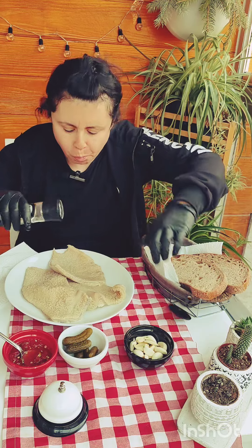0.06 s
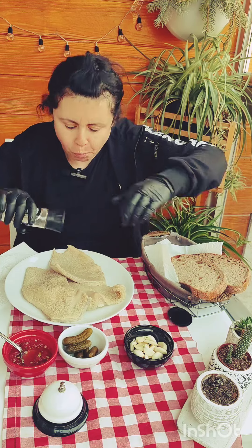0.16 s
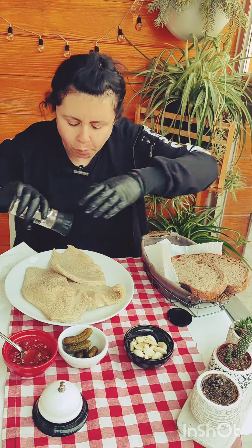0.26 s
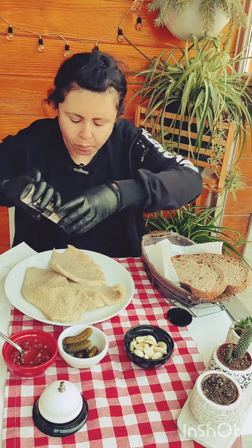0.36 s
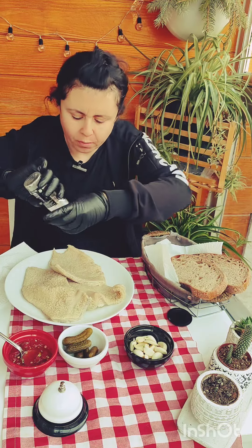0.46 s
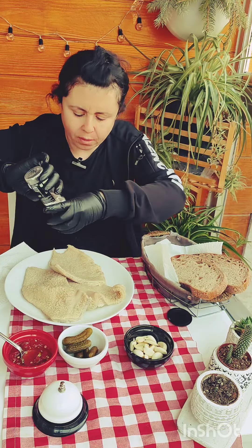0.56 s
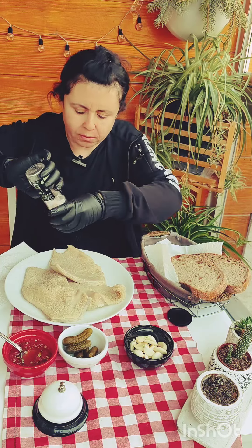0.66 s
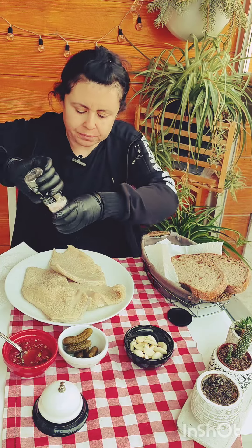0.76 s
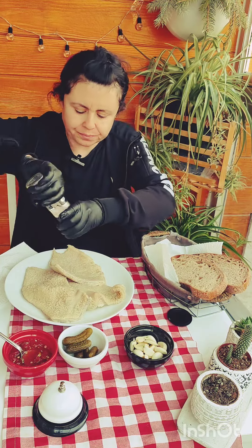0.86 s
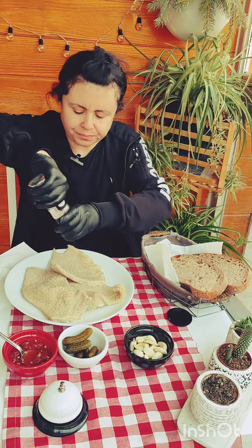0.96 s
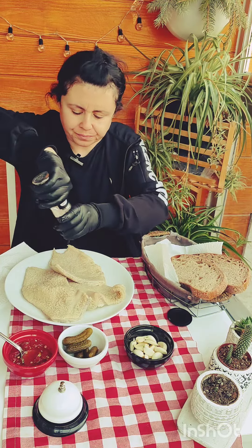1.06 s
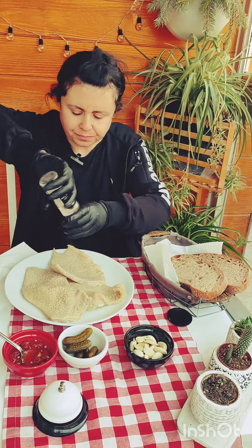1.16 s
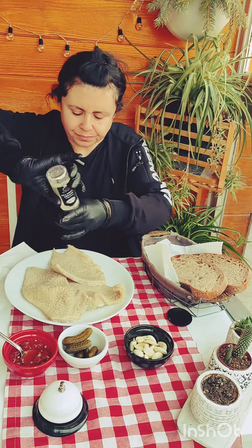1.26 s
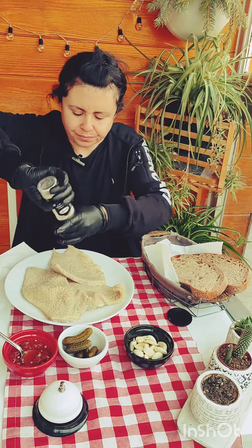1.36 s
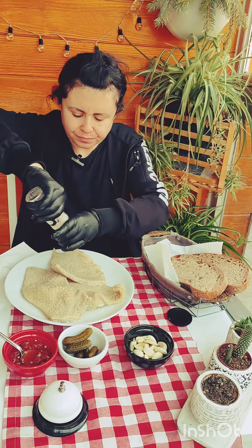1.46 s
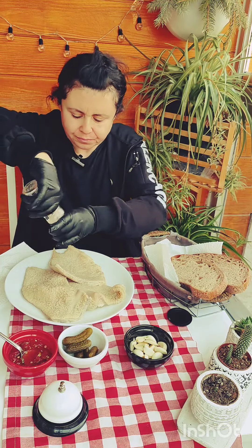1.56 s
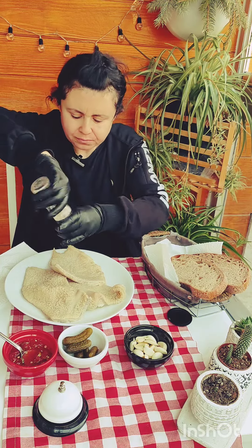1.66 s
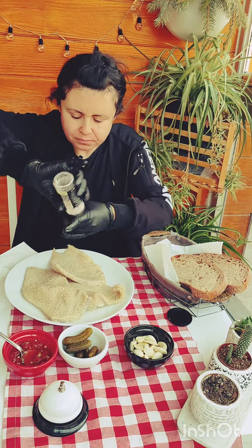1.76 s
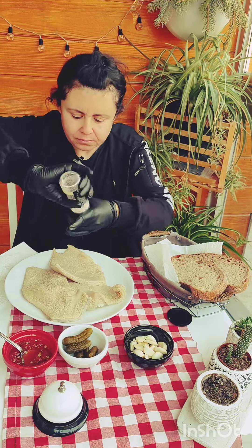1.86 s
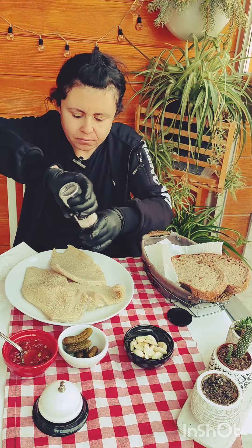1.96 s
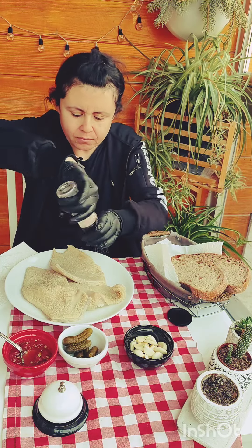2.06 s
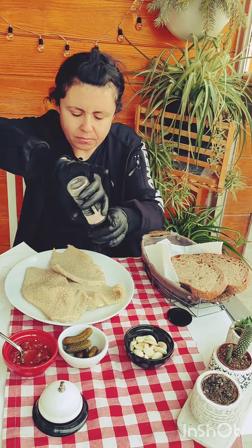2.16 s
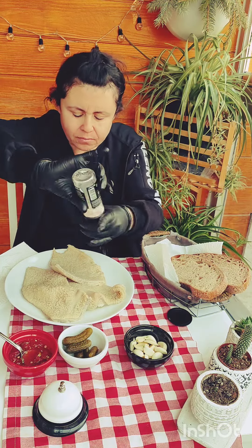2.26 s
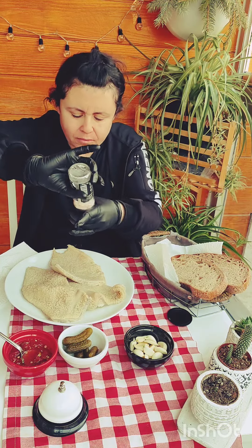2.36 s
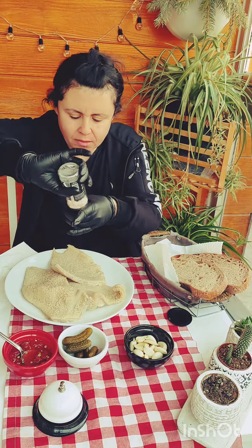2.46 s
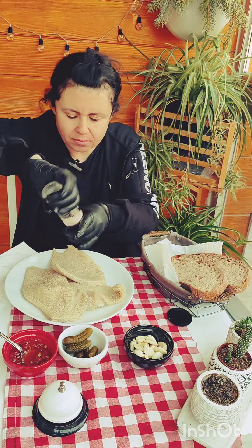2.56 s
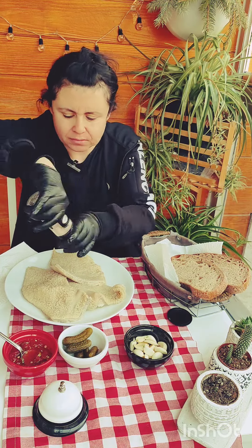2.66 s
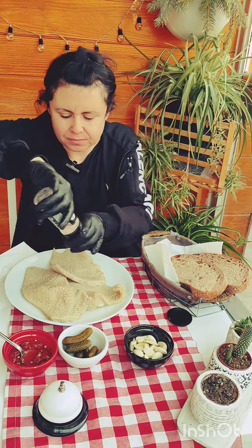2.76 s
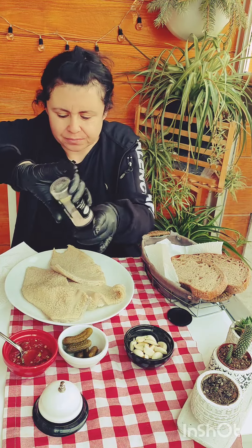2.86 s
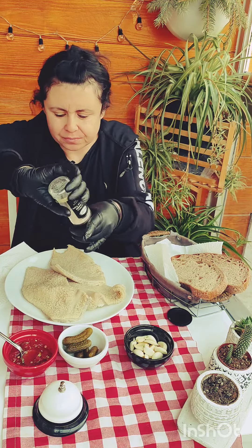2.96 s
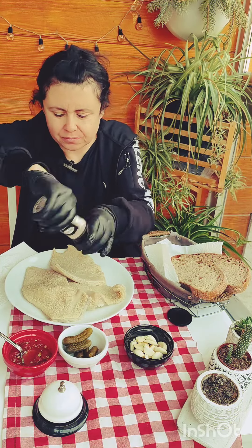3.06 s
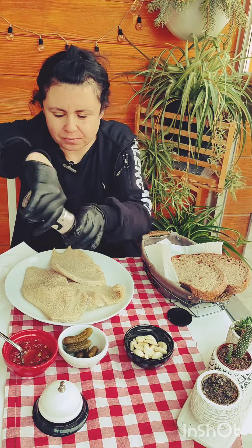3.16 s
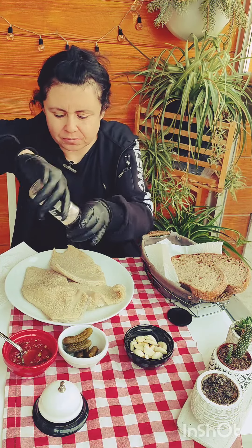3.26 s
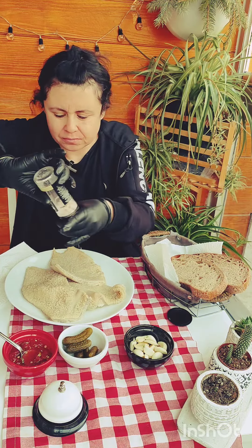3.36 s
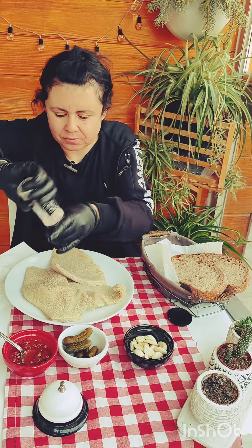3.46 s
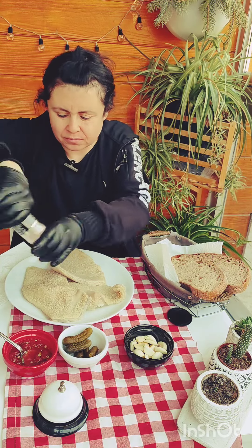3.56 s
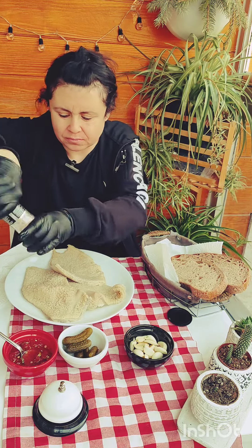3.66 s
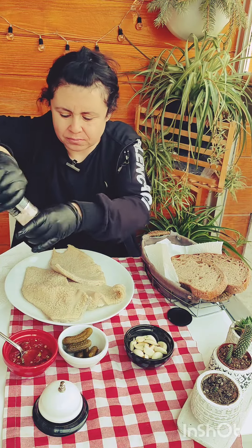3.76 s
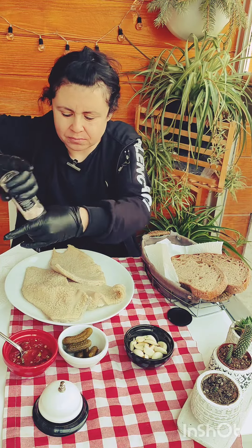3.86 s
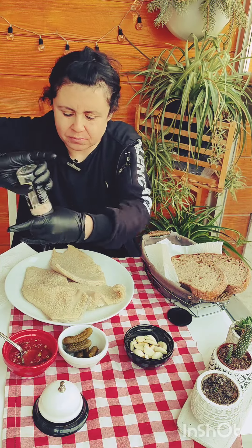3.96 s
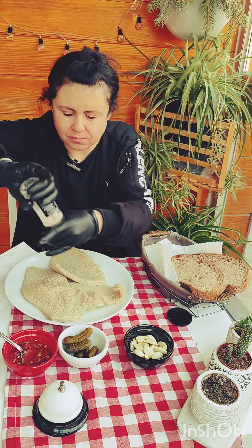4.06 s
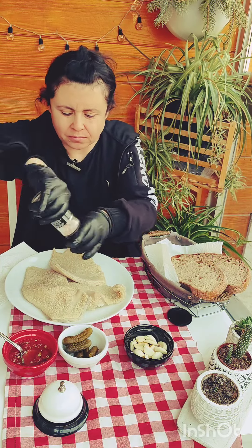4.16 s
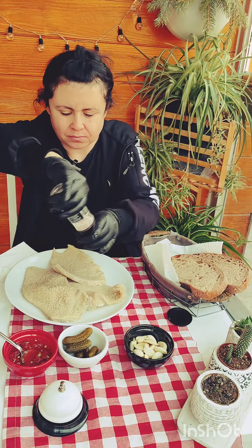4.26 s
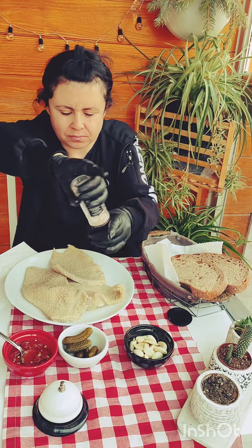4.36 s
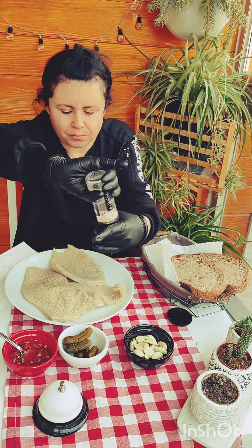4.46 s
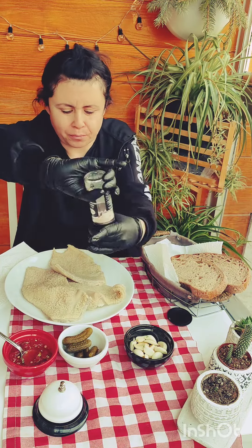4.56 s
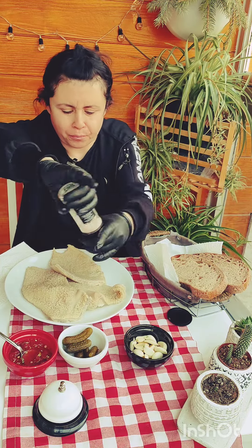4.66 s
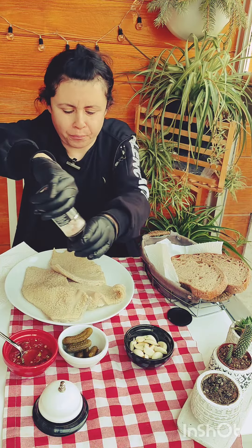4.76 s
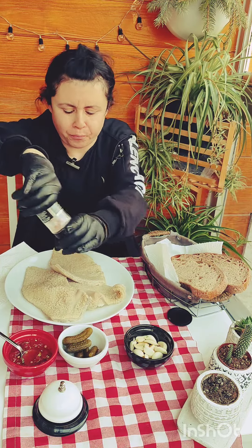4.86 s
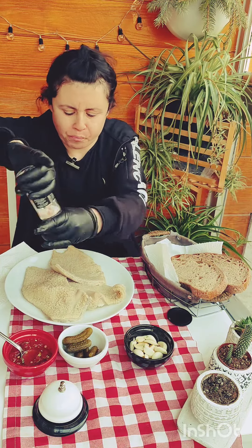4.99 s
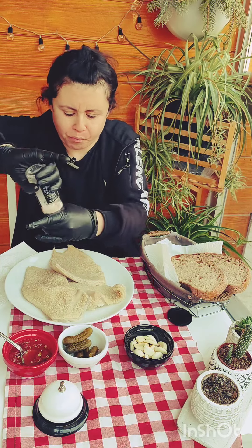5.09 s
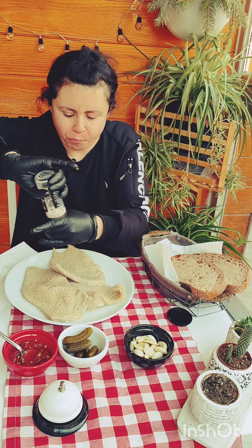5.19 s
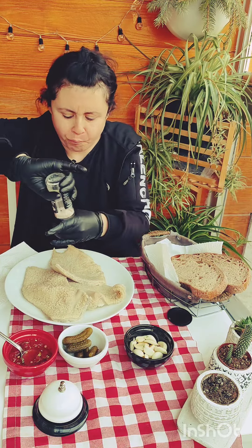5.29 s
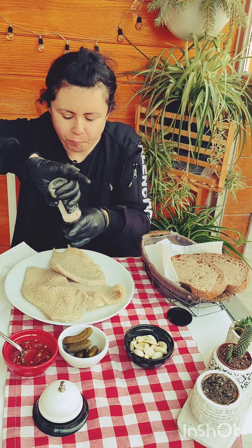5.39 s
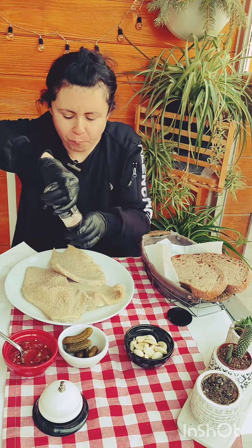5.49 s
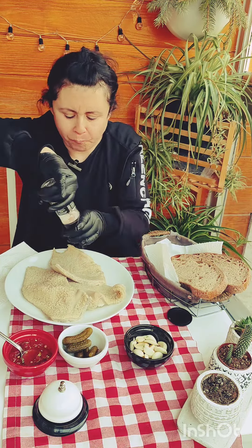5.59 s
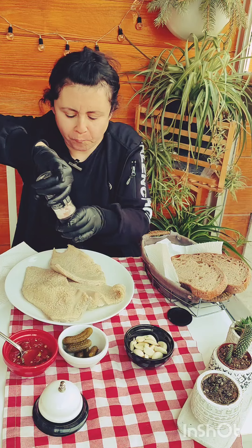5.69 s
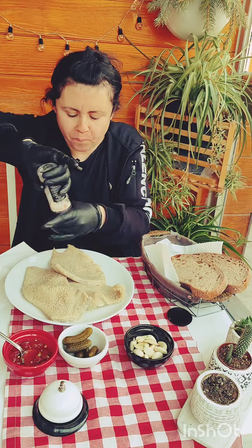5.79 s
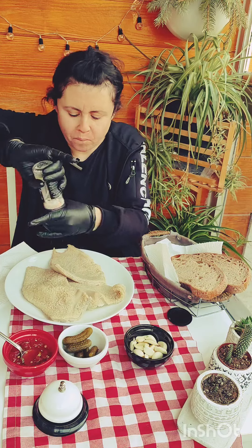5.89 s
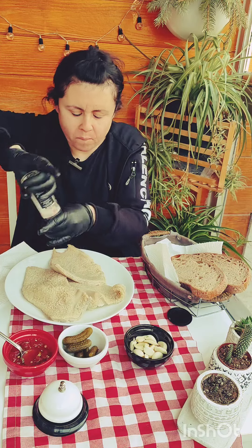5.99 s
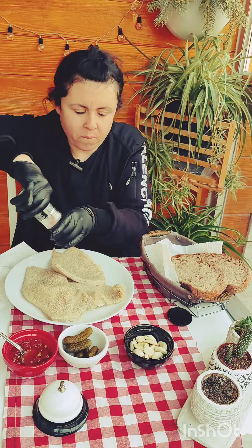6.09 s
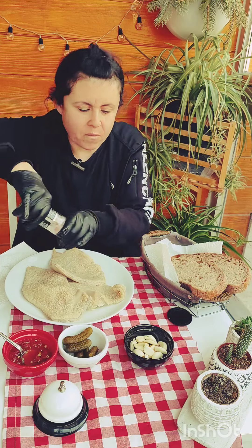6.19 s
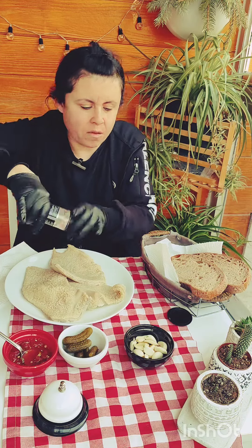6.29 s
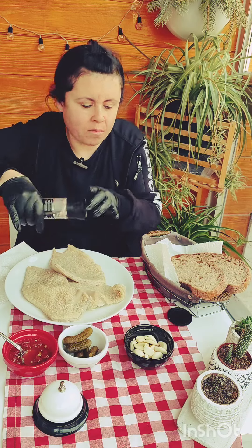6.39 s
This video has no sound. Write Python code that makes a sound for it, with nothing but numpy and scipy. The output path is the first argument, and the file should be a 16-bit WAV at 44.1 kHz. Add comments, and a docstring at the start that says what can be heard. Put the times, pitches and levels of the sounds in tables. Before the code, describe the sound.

Close, slightly thin pickup in a small, live wooden room with quiet hiss, a very faint steady whine and slow, barely noticeable swells of broad noise. At 0.03 s a plastic cap lands on a cloth-covered table, hollow thuds rocking quickly to rest by 0.25. From 0.2 to 0.6 salt slides and ticks brightly in the jar; rubber gloves brush and squeak near 0.55. Then a hand mill bites in short gritty crunches, big crystals snapping in rapid clusters: about 0.95, 1.5, 2.0, 2.6, 3.15, 3.6, a heavier, lower one at 4.2, then 4.7, 5.5 and 6.15. Each lasts only one or two tenths of a second, with a short room tail. Between them come soft burr scrapes, clearest around 4.0 and 4.5, small salt shifts, a glove rub at 3.45 and a faint squeak near 5.1. Tiny grain ticks and a light glove brush close at 6.4.

```python
"""A mill's plastic cap lands and rocks on a cloth-covered table in a small, live room: noise thuds over ringing modes.
Salt slides down the jar as filtered grains and ticks it with short pings; gloves brush and squeak as rough tones.
Then come the hand salt mill's forward turns: bites of crumbling noise, and big crystals snapping as pitched bursts.
Around them, unloaded burrs scrape as bumpy noise, and more salt and glove sounds return.
Behind it all, faint broad noise slowly rises and falls over steady room noise and a thin electrical whine."""
import sys
import numpy as np
from scipy import signal
from scipy.fft import rfft, irfft
from scipy.io import wavfile
from scipy.ndimage import uniform_filter1d, minimum_filter1d

SR = 44100
rng = np.random.default_rng(int(sys.argv[2]) if len(sys.argv) > 2 else 0)


def master_out(mix):
    """Clip the mix to full scale and print it as 16-bit PCM to the path in sys.argv[1]."""
    frames = np.transpose(np.atleast_2d(mix))
    ceiling = np.clip(frames, -1, 1)
    pcm = np.round(ceiling * 32767).astype(np.int16)
    wavfile.write(sys.argv[1], SR, pcm)


N = 283563  # length in samples

# Event levels are relative: each source adds its own trim, then the room and microphone act on the mix.
# big crystals snapping: start_s [s], knock_db [dB], pitch_hz [Hz], splinter_db [dB]
CRYSTAL_CRACKS = [(.728, -50, 1596, -55), (0.953, -13, 1690, -18), (0.977, -19.5, 1640, -27),
                  (1.025, -39.5, 2010, -26.5), (1.08, -15.5, 1950, -16), (1.089, -13.5, 1350, -24.5),
                  (1.098, -20, 1500, -28), (1.471, -47, 1500, -56), (1.512, -23.5, 3200, -17),
                  (1.521, -20, 2100, -17.5), (1.528, -9.5, 1750, -20.5), (1.539, -11.5, 1965, -18.5),
                  (1.546, -13, 1565, -22.5), (1.658, -25, 1850, -28.5), (2.02, -29.5, 2180, -25),
                  (2.042, -20, 1900, -18.5), (2.061, -12.5, 1976, -22.5), (2.09, -10, 1940, -20.5),
                  (2.136, -12.5, 1300, -28.5), (2.143, -19.5, 2380, -34.5), (2.634, -17.5, 1954, -20),
                  (2.646, -9.5, 1680, -22.5), (2.657, -13, 1806, -28), (2.667, -11, 1880, -21.5),
                  (2.678, -15.5, 1210, -22.5), (2.688, -10.5, 1870, -23), (3.154, -16.5, 2200, -24),
                  (3.166, -12, 1840, -23.5), (3.178, -10, 1196, -27), (3.192, -17, 1880, -21.5),
                  (3.575, -9.5, 4310, -25.5), (3.605, -14.5, 2100, -26), (3.623, -14, 1490, -28.5),
                  (3.638, -13, 2000, -17), (3.655, -8.5, 1820, -20.5), (3.671, -13.5, 1280, -23),
                  (3.691, -14.5, 2264, -26.5), (3.932, -25, 1190, -33), (3.972, -35, 1210, -37),
                  (3.995, -33.5, 1390, -25.5), (4.192, -10, 1740, -15), (4.206, -11.5, 1600, -19.5),
                  (4.226, -11, 1360, -21), (4.244, -3.5, 950, -26.5), (4.269, -12.5, 985, -23.5),
                  (4.323, -33.5, 1390, -33.5), (4.537, -23, 1090, -36), (4.725, -22, 1300, -30),
                  (4.738, -28.5, 2480, -16), (4.746, -9, 950, -17.5), (4.774, -11, 1760, -18.5),
                  (4.808, -14, 1210, -23), (4.815, -10.5, 1880, -22), (4.883, -18, 970, -24.5),
                  (5.561, -9, 1360, -20.5), (5.577, -9, 1670, -21.5), (5.613, -15.5, 1300, -29),
                  (6.159, -18.5, 3780, -18), (6.169, -18, 2027, -25), (6.195, -18.5, 2350, -29.5)]
# the burrs biting into salt: start_s [s], length_s [s], crumble_db [dB], powder_db [dB]
BURR_BITES = [(0.958, 0.026, -13.5, -24.5), (1.086, .035, -19.5, -27.5), (1.517, 0.05, -12, -20),
              (1.63, .026, -22.5, -31.5), (2.033, .036, -12, -20.5), (2.11, 0.023, -18.5, -30.5),
              (2.63, 0.046, -13.5, -22), (2.7, 0.087, -23.5, -34), (3.129, 0.026, -28.5, -28),
              (3.146, .036, -10.5, -21), (3.195, 0.076, -26.5, -37.5), (3.565, .03, -23, -23),
              (3.596, .068, -11, -20.5), (3.673, .045, -16.5, -33), (4.199, .055, -24, -25.5),
              (4.727, 0.029, -13, -18.5), (4.796, 0.065, -18, -26.5), (4.875, 0.03, -16.5, -42),
              (5.498, 0.021, -21.5, -28), (5.566, 0.042, -22, -27.5), (6.108, .03, -30.5, -32.5),
              (6.162, 0.037, -14.5, -27), (6.222, .072, -23.5, -38.5)]
# scrapes on the way back or just before the burrs catch:
# peak_s [s], rise_s [s], fall_s [s], scrape_db [dB], powder_db [dB]
BURR_SCRAPES = [(1.315, 0.047, 0.054, -71, -40.5), (1.5, 0.074, .02, -59.5, -60),
                (1.83, 0.071, .2, -62.5, -47), (3.9, 0.029, 0.091, -41, -36),
                (3.981, 0.077, 0.071, -19.5, -31.5), (4.182, 0.02, .015, -36.5, -34),
                (4.492, 0.021, 0.12, -34.5, -35.5), (4.577, 0.05, 0.039, -26, -29),
                (5.061, 0.058, 0.076, -54, -52.5), (5.169, 0.087, 0.039, -34, -33.5),
                (5.26, 0.032, 0.033, -55.5, -49.5), (5.497, 0.034, .02, -45, -49.5),
                (5.935, .09, 0.038, -42, -47), (6.105, 0.02, .02, -43, -48.5)]
# forward turns, whose grip opens or muffles the mill's hollow: start_s [s], thrum_db [dB], belly_db [dB]
MILL_TURNS = [(.95, 10, 3), (1.511, 3.5, -7), (2.02, -0.5, -2.5), (2.631, -1, 6), (3.131, 8, 0.5),
              (3.57, -1.5, -2.5), (4.18, 0.5, 1.5), (4.719, 6, 6.5), (5.499, -0.5, 3.5), (6.121, -1, 1.5)]
# salt sliding as the jar tilts: peak_s [s], rise_s [s], fall_s [s], level_db [dB]
SALT_SLIDES = [(.228, .045, .07, -28), (.31, .09, .25, -42), (.45, .15, .2, -44.5),
               (.525, 0.033, 0.067, -25.5), (.578, .08, 0.047, -24), (.73, 0.056, .04, -54),
               (1.38, 0.072, 0.063, -44), (2.29, 0.14, 0.11, -54), (2.39, 0.11, 0.069, -56.5),
               (3.12, 0.033, 0.035, -45), (3.365, 0.033, .11, -45.5), (3.79, 0.081, 0.13, -40),
               (4.178, 0.047, .02, -32.5), (5.49, 0.033, 0.027, -51.5)]
# loose grains hitting the jar: start_s [s], level_db [dB], pitch_hz [Hz]
GRAIN_TICKS = [(0.226, -25.5, 6970), (0.278, -32.5, 6320), (0.37, -35.5, 5900), (0.456, -35, 6090),
               (0.497, -33.5, 6410), (0.521, -22.5, 8440), (0.578, -27, 6920), (1.367, -35.5, 6910),
               (1.378, -31.5, 6610), (2.008, -33.5, 6960), (2.951, -47.5, 13700), (3.131, -27, 8770),
               (4.18, -27, 7250), (4.948, -38, 7540), (5.165, -25, 7810), (6.126, -25, 6810),
               (6.389, -34, 6770), (6.404, -34, 5650)]
# gloves brushing the mill: peak_s [s], rise_s [s], fall_s [s], level_db [dB]
GLOVE_RUBS = [(0.528, 0.019, 0.04, -34.5), (0.575, 0.066, 0.06, -28), (3.436, 0.012, 0.051, -29.5),
              (3.468, 0.031, 0.065, -27.5), (6.4, 0.017, 0.2, -39)]
# gloves slipping on the mill: start_s [s], length_s [s], level_db [dB], pitch_hz [Hz], width_hz [Hz]
GLOVE_SQUEAKS = [(0.523, 0.04, -27, 1906, 135), (0.546, 0.052, -34.5, 1895, 202),
                 (0.548, 0.057, -36.5, 3345, 690), (1.638, 0.029, -36.5, 1571, 200),
                 (3.041, 0.027, -57, 582, 162), (3.432, 0.029, -36, 4500, 656),
                 (3.452, 0.075, -33, 4028, 446), (4.995, 0.077, -52.5, 3880, 90),
                 (5.032, 0.066, -49, 1116, 69), (5.043, 0.099, -53.5, 2976, 140),
                 (5.129, 0.071, -38, 1230, 111.3), (5.875, 0.032, -54.5, 636, 133),
                 (6.4, 0.017, -45, 3240, 500)]
# the cap landing and rocking on the cloth: start_s [s], level_db [dB]
CAP_HITS = [(.034, -15), (0.041, -11), (.053, -16), (0.061, -9), (.081, -28), (0.094, -21.5),
            (0.121, -23.5), (0.154, -22.5), (0.189, -34.5), (0.217, -30.5), (0.236, -36.5)]
# slow rises and falls of faint background noise: peak_s [s], rise_s [s], fall_s [s], level_db [dB]
BACKGROUND_SWELLS = [(.65, .8, 0.27, -60), (1.3, 0.98, .7, -63.5), (2.3, .6, 0.2, -64), (3.4, 1, 1, -64.5),
                     (4.4, 1, .8, -62), (5.25, 1, 0.33, -58), (5.8, .3, 0.25, -64.5), (6.42, 0.26, .5, -59)]

# Spectra give the shape only; colour() sets their energy.
# salt breaking up: freq_hz [Hz], level_db [dB]
CRUMBLE_SPECTRUM = [(40, -43.5), (150, -36.5), (280, -11.5), (450, -12), (700, -3), (1100, 4.5),
                    (1800, 0.5), (2600, -1.5), (3400, 1.5), (3900, -4.5), (4400, -3), (5400, -14.5),
                    (8000, -23.5), (16000, -51.5)]
# bright splinters of a crystal: freq_hz [Hz], level_db [dB]
SPLINTER_SPECTRUM = [(2000, -25), (4300, -5.5), (5400, -13.5), (7200, 2), (8100, -7), (9200, -5),
                     (10300, -17), (12700, -24.5), (16000, -30.5)]
# fine salt powder: freq_hz [Hz], level_db [dB]
POWDER_SPECTRUM = [(2000, -34), (5400, -17.5), (6500, -7.5), (7200, -0.5), (8100, -10.5), (9200, -6),
                   (10300, -16), (11300, -11.5), (12700, -20.5), (14000, -20), (16000, -24.5)]
# burrs scraping unloaded: freq_hz [Hz], level_db [dB]
SCRAPE_SPECTRUM = [(59, -93.5), (100, -28.5), (202, -22), (269, -7.5), (370, -11.5), (676, -6), (1030, 3),
                   (1510, -2.5), (1910, -2.5), (2080, -10), (2720, -3.5), (3930, -14), (5500, -21.5),
                   (7150, -39), (12100, -120)]
# salt against the jar wall: freq_hz [Hz], level_db [dB]
JAR_SPECTRUM = [(2000, -35), (5300, -24), (5800, -12), (6150, 1), (6700, -3), (7300, -5), (8000, -10),
                (8900, -7), (10200, -20), (12800, -21), (14100, -8), (15000, -16), (16000, -28)]
# rubber glove on the mill: freq_hz [Hz], level_db [dB]
GLOVE_SPECTRUM = [(500, -46.5), (2200, -34), (3200, -5.5), (4200, -0.5), (5200, -3), (7000, -2),
                  (10000, -7.5), (15000, -20.5)]
# thud of the cap: freq_hz [Hz], level_db [dB]
CAP_SPECTRUM = [(50, -54), (160, -33), (330, -0.5), (600, 5.5), (1100, 2), (1700, -8), (2200, -16.5),
                (3000, -25.5), (4500, -33), (5500, -61.5), (12000, -72.5)]
# broad background noise that rises and falls: freq_hz [Hz], level_db [dB]
BACKGROUND_SPECTRUM = [(60, -12.5), (300, -2), (550, -3), (900, -4), (2000, -9.5), (4500, -3.5),
                       (6000, -16.5), (15000, -20)]
# quiet room noise: freq_hz [Hz], level_db [dB]
FLOOR_SPECTRUM = [(18, -62.5), (30, -23), (394, 0.5), (740, -14), (801, -1.5), (866, -11), (1630, -6.5),
                  (5310, -24.5), (6900, -11.5), (14000, -23), (16000, -35)]

# ringing of the plastic cap: freq_hz [Hz], level_db [dB], t60_s [s]
CAP_RINGING = [(345.4, -1, 0.43), (574, -3, 0.18), (700, 1, 0.083), (807, 3, 0.15), (1036, 4, .16),
               (1100, 6, 0.1), (1207, 0, 0.2), (1434, 1, 0.25)]
# steady resonances of the room: freq_hz [Hz], level_db [dB], t60_s [s]
ROOM_RINGING = [(275, 3, .36), (346, 3, .25), (548, 5, .2), (865, -4, .24), (1272, -3, .28),
                (1523, -1, .26), (1830, -2, .25), (2004, 2, .2), (3425, -3, .2), (4232, 0, .25)]
# decay of the room's echoes: freq_hz [Hz], t60_s [s]
ROOM_DECAY = [(200, 0.57), (550, 0.24), (1400, 0.23), (3700, 0.27), (7000, .19), (9700, 0.21), (12000, 0.1),
              (15000, 0.27)]
# electrical whine: freq_hz [Hz], peak_db [dB, peak amplitude]
WHINE_PARTIALS = [(800, -68), (1600, -72), (2400, -77), (3200, -76), (4000, -77), (4800, -83), (5600, -85),
                  (6400, -85)]

BITE_ATTACK_S, BITE_SAG_DB_PER_S, BITE_RELEASE_DB_PER_S = 0.0078, 30, 597
SWELL_DB = 20  # climb over a swell's rise, and drop over its fall
TOP_HZ = 15700  # band limit of the microphone


def amp(db):
    """Decibels to gain."""
    return 10 ** (np.asarray(db) / 20)


def unit(x):
    """Scale to rms 1."""
    return x / np.sqrt(np.mean(x ** 2) + 1e-20)


def along(points, hz):
    """Read (Hz, value) points on a log frequency axis."""
    point_hz, values = np.transpose(points)
    return np.interp(np.log(hz + 1), np.log(point_hz), values)


def add(track, s, sound):
    """Mix a sound into the track at time s, in seconds."""
    part = track[max(round(s * SR), 0):][:len(sound)]
    part += sound[:len(part)]


def colour(x, spectrum, size=2048):
    """Pass x through a causal, minimum-phase body of unit energy with this spectrum."""
    level_db = along(spectrum, np.fft.rfftfreq(size, 1 / SR))
    cepstrum = irfft(np.log(amp(level_db)))
    # folding the cepstrum puts the body's energy as early as possible
    cepstrum[1:size // 2] *= 2
    cepstrum[size // 2 + 1:] = 0
    body = irfft(np.exp(rfft(cepstrum)))
    return signal.fftconvolve(x, body / np.linalg.norm(body))[:len(x)]


def grains(rate, spread_db, hiss, smear_s=0.00047):
    """Uneven tiny impacts (rate per second), each a brief rasp, over a hiss of smaller ones; rms 1."""
    hits = rng.random(N) < rate / SR
    sizes = amp(spread_db * np.clip(rng.standard_normal(N), -2, 2)) * hits
    power = signal.lfilter([1], [1, -np.exp(-1 / (smear_s * SR))], sizes ** 2)
    envelope = np.sqrt(power / power.mean() + hiss ** 2)
    return unit(envelope * rng.standard_normal(N))


def ring(modes, t):
    """Sum decaying modes with random phases."""
    total = 0
    for hz, db, t60_s in modes:
        total = total + amp(db - 60 * t / t60_s) * np.sin(2 * np.pi * (hz * t + rng.random()))
    return total


def blow(x, size=176):
    """Scale a short hit by the level of its attack, the first 4 ms unless given in samples."""
    return x / (x[:size].std() + 1e-12)


def swell(peak_s, rise_s, fall_s):
    """Gain of one swell: it climbs SWELL_DB to its peak over the rise and keeps sinking at the fall's rate."""
    t = np.arange(N) / SR - peak_s
    return amp(-SWELL_DB * np.maximum(-t / rise_s, t / fall_s))


def swells(rows):
    """Summed gain of several swells, each with its own level."""
    return sum(amp(db) * swell(peak_s, rise_s, fall_s) for peak_s, rise_s, fall_s, db in rows)


def crystal_cracks(knock_t60_s=0.007, splinter_t60_s=0.02, rise_s=0.00048, kick_gain=1.204,
                   knock_db=0, splinter_db=-1):
    """A crystal bursts: a spray of splinters, and a kick that rings the hand-damped mill for a few cycles."""
    out, t = np.zeros(N), np.arange(SR // 30) / SR
    onset = 1 - np.exp(-(t / rise_s) ** 2)
    knock_fade = onset * amp(-60 * t / knock_t60_s)
    splinter_fade = onset * amp(-60 * t / splinter_t60_s)
    for s, db, hz, fine_db in CRYSTAL_CRACKS:
        burst = blow(colour(rng.standard_normal(len(t)) * knock_fade, CRUMBLE_SPECTRUM))
        # the gradient thins the bass: a small body radiates little of it
        kick = blow(np.gradient(onset * ring([(hz, 0, knock_t60_s)], t)))
        splinters = blow(colour(rng.standard_normal(len(t)) * splinter_fade, SPLINTER_SPECTRUM))
        knock = blow(burst + kick_gain * kick)
        add(out, s, amp(db + knock_db) * knock + amp(fine_db + splinter_db) * splinters)
    return out


def bite(start_s, length_s):
    """Gain of one bite: the burrs catch quickly, the load sags as the salt gives way, then lets go."""
    t = np.maximum(np.arange(N) / SR - start_s, 0)
    past_end = np.maximum(t - length_s, 0)
    return np.minimum(t / BITE_ATTACK_S, 1) * amp(-BITE_SAG_DB_PER_S * t - BITE_RELEASE_DB_PER_S * past_end)


def grinding(crumble_db=-6, powder_db=-6):
    """Small fragments crumble between the burrs; each break also sheds powder."""
    breaks = grains(rate=580, spread_db=5, hiss=.35)
    dust = unit(breaks + 1.2 * grains(rate=3600, spread_db=22.5, hiss=0.56))
    coarse_gain, fine_gain = np.zeros(N), np.zeros(N)
    for s, length_s, db, fine_db in BURR_BITES:
        gain = bite(s, length_s)
        coarse_gain += amp(db) * gain
        fine_gain += amp(fine_db) * gain
    crumbling = colour(breaks * coarse_gain, CRUMBLE_SPECTRUM) * amp(crumble_db)
    powder = colour(dust * fine_gain, POWDER_SPECTRUM) * amp(powder_db)
    return crumbling + powder


def burr_scrapes(scrape_db=-3, powder_db=-3):
    """Unloaded, the burrs only scrape over the powder."""
    bumps = grains(rate=400, spread_db=6.5, hiss=1.0)
    coarse_gain, fine_gain = np.zeros(N), np.zeros(N)
    for peak_s, rise_s, fall_s, db, fine_db in BURR_SCRAPES:
        gain = swell(peak_s, rise_s, fall_s)
        coarse_gain += amp(db) * gain
        fine_gain += amp(fine_db) * gain
    scrape = colour(bumps * coarse_gain, SCRAPE_SPECTRUM) * amp(scrape_db)
    powder = colour(bumps * fine_gain, POWDER_SPECTRUM) * amp(powder_db)
    return scrape + powder


def turn_at(s, lead_s=.03):
    """Rows of the turns under way at times s; the grip is set just before a turn starts."""
    turns = np.array(MILL_TURNS)
    return turns[np.maximum(np.searchsorted(turns[:, 0] - lead_s, s) - 1, 0)]


def hump(hz, centre_hz, width):
    """A resonance's bell shape on a log frequency axis, width in natural-log units."""
    return np.exp(-(np.log((hz[:, None] + 1) / centre_hz) / width) ** 2)


def held_mill(x, thrum_hz=275, belly_hz=680, thrum_width=0.4, belly_width=0.45):
    """The hands set the low resonances anew each turn; small level changes, patchy over pitch and time, roughen it."""
    hz, t, z = signal.stft(x, SR, nperseg=512)
    _, thrum_db, belly_db = turn_at(t).T
    grip_db = hump(hz, thrum_hz, thrum_width) * thrum_db + hump(hz, belly_hz, belly_width) * belly_db
    patches = uniform_filter1d(rng.standard_normal(z.shape), size=3, axis=0)  # across frequency
    patches = uniform_filter1d(patches, size=6, axis=1)  # across time
    patch_db = 2.5 * unit(patches)
    return signal.istft(z * amp(grip_db + patch_db), SR, nperseg=512)[1][:N]


def loose_salt(slide_db=-3, tick_db=-1, rasp_gain=.45):
    """Grains slide down the jar; the big ones tick against its wall and ring it briefly."""
    sliding = grains(rate=2100, spread_db=7.0, hiss=0.47) * swells(SALT_SLIDES)
    out = colour(sliding, JAR_SPECTRUM) * amp(slide_db)
    t = np.arange(SR // 40) / SR
    fade = amp(-60 * t / .009) * (1 - np.exp(-t / .0006))  # 9 ms t60, 0.6 ms rise
    for s, db, hz in GRAIN_TICKS:
        rasp = blow(colour(rng.standard_normal(len(t)) * fade, JAR_SPECTRUM))
        ping = blow(fade * np.sin(2 * np.pi * hz * t))
        add(out, s, amp(db + tick_db) * blow(rasp_gain * rasp + ping))
    return out


def gloves(rub_db=-5, squeak_db=0):
    """Rubber brushes over the mill, or sticks and slips in short, rough squeaks."""
    rubbing = grains(rate=5000, spread_db=10.5, hiss=0.52) * swells(GLOVE_RUBS)
    out = amp(rub_db) * colour(rubbing, GLOVE_SPECTRUM)
    t = np.arange(SR // 8) / SR
    for s, length_s, db, hz, width_hz in GLOVE_SQUEAKS:
        # slow noise on both quadratures roughens the tone's level and pitch
        smoother = signal.butter(2, width_hz, fs=SR, output="sos")
        slips = signal.sosfilt(smoother, rng.standard_normal((2, len(t))))
        tone = slips[0] * np.cos(2 * np.pi * hz * t) + slips[1] * np.sin(2 * np.pi * hz * t)
        squeak = tone * np.sin(np.pi * np.clip(t / length_s, 0, 1) ** 0.84)
        rms = np.sqrt(np.sum(squeak ** 2) / (length_s * SR))
        add(out, s, amp(db + squeak_db) * squeak / rms)
    return out


def cap_landing(thud_t60_s=0.064, rise_s=0.00037, thud_db=0, ring_db=-11):
    """The cap lands on the cloth-covered table and rocks to rest, each contact a thud over plastic modes."""
    out, t = np.zeros(N), np.arange(SR // 3) / SR
    onset = 1 - np.exp(-t / rise_s)
    for s, db in CAP_HITS:
        thud_noise = rng.standard_normal(len(t)) * onset * amp(-60 * t / thud_t60_s)
        thud = blow(colour(thud_noise, CAP_SPECTRUM), size=400)
        ringing = blow(ring(CAP_RINGING, t) * onset, size=400)
        add(out, s, amp(db) * (amp(thud_db) * thud + amp(ring_db) * ringing))
    return out


def background_swells():
    """Faint broad background noise, slightly grainy, that slowly rises and falls."""
    noise = grains(rate=500, spread_db=4, hiss=0.9)
    return colour(noise * swells(BACKGROUND_SWELLS), BACKGROUND_SPECTRUM)


def room(x, delay_s=0.0018, modes_db=-17.5, count=16):
    """Close wooden walls answer; the echo pattern changes slowly and steadily, the modes stay."""
    t, out = np.arange(SR // 2) / SR, np.zeros(N)
    modes, hop = amp(modes_db) * unit(ring(ROOM_RINGING, t)), N // count
    for start in range(-hop, N, hop):
        # a fresh noise tail, each band fading at its own rate
        hz, age_s, z = signal.stft(rng.standard_normal(len(t)), SR, nperseg=256)
        decay = amp(-60 * age_s / along(ROOM_DECAY, hz)[:, None])
        echoes = signal.istft(z * decay, SR, nperseg=256)[1][:len(t)]
        tail = (unit(echoes) + modes) * (1 - np.exp(-(t / delay_s) ** 2))
        # overlapping windows crossfade from one tail to the next
        n = np.arange(max(start, 0), min(start + 2 * hop, N))
        window = np.sin(np.pi * (n - start) / (2 * hop))
        add(out, n[0] / SR, signal.fftconvolve(x[n] * window, tail / np.linalg.norm(tail)))
    return out


def floor(hiss_db=-69):
    """Quiet room noise from shaped hiss, and a thin electrical whine from steady sines."""
    t = np.arange(N) / SR
    whine = sum(amp(db) * np.sin(2 * np.pi * (hz * t + rng.random())) for hz, db in WHINE_PARTIALS)
    return amp(hiss_db) * colour(rng.standard_normal(N), FLOOR_SPECTRUM) + whine


def scene(room_db=-6):
    """The mill, the hands and the cap in their room, over the background noise."""
    mill = held_mill(crystal_cracks() + grinding() + burr_scrapes())
    direct = mill + loose_salt() + gloves() + cap_landing() + background_swells()
    return (direct + amp(room_db) * room(direct) + floor())[None]


def record(dry, low_cut_hz=70, size=45):
    """The small microphone sheds bass, a fast limiter holds peaks down; nothing stays above the band limit."""
    low_cut = signal.butter(2, low_cut_hz, "high", fs=SR, output="sos")
    thin = signal.sosfilt(low_cut, dry)
    needed_gain = .93 / np.maximum(np.abs(thin), .93)
    # hold the lowest gain around each peak, then smooth it; size in samples
    limited = thin * uniform_filter1d(minimum_filter1d(needed_gain, 2 * size), size)
    hz = np.fft.rfftfreq(2 * N, 1 / SR)
    return irfft(rfft(limited, 2 * N) * (hz < TOP_HZ), 2 * N)[:, :N]


dry = scene()
out = record(dry)
master_out(out)
```